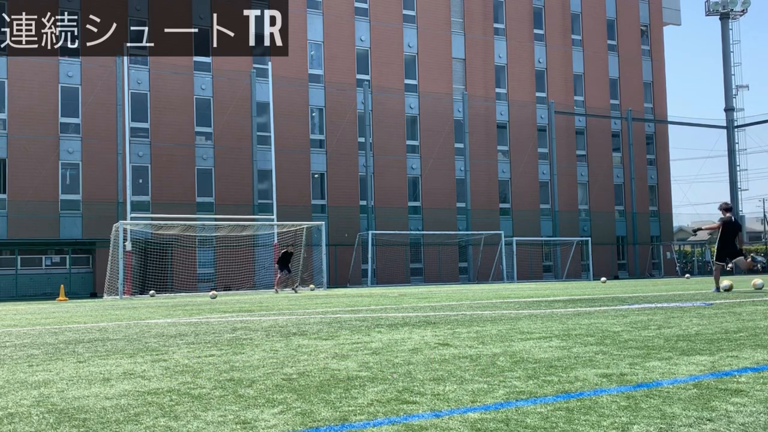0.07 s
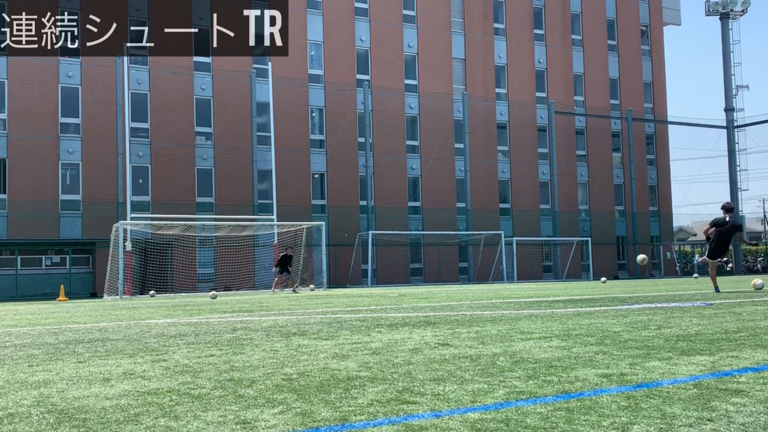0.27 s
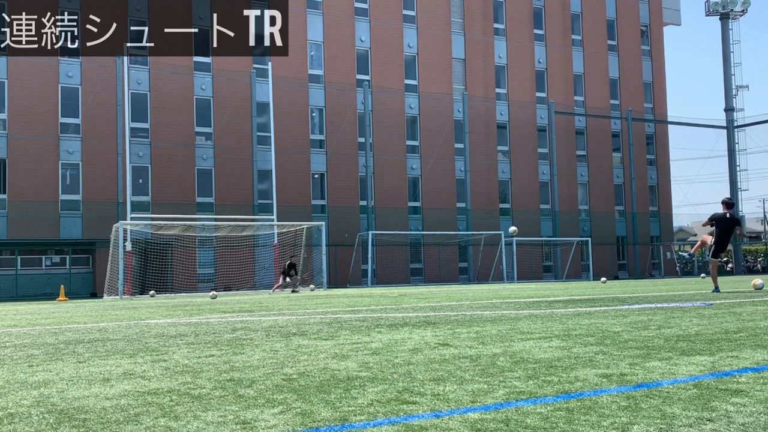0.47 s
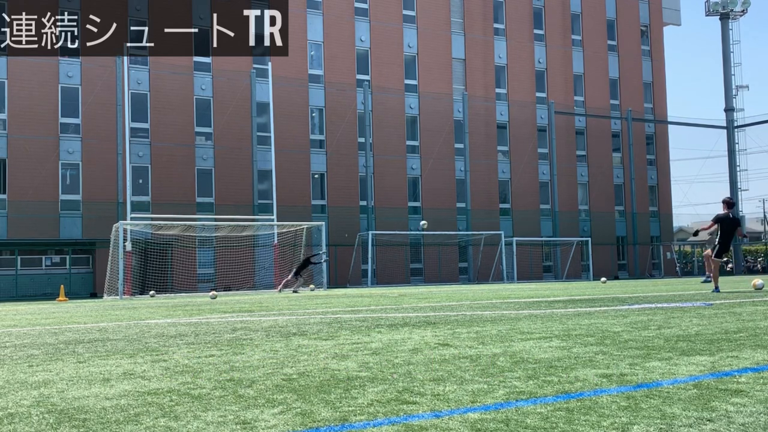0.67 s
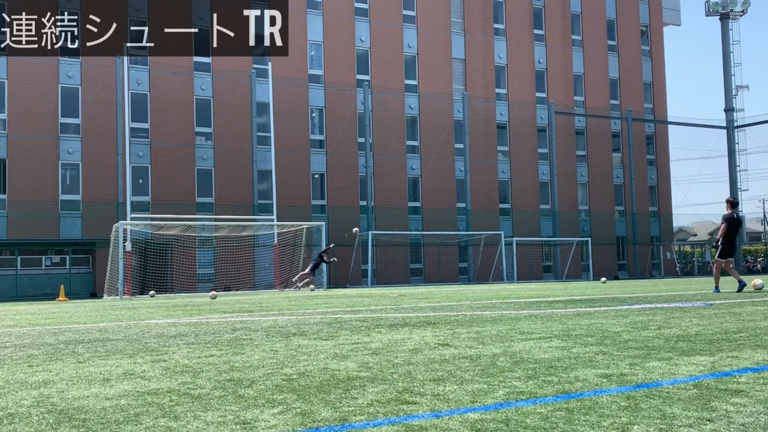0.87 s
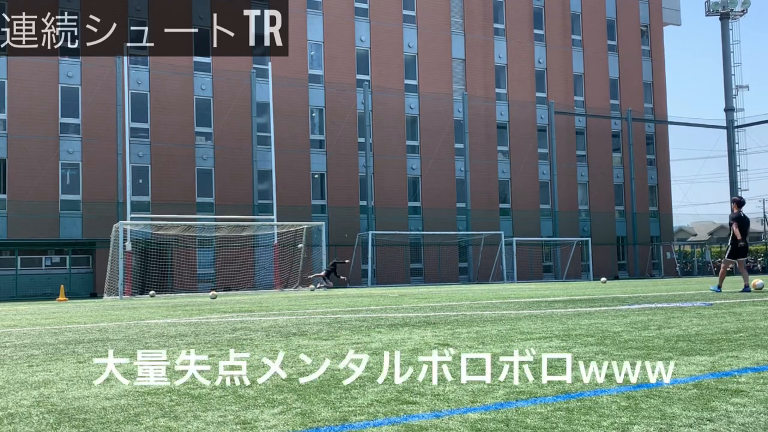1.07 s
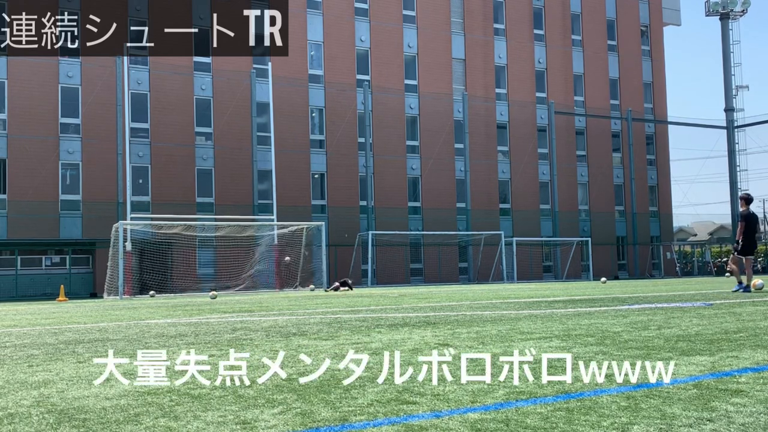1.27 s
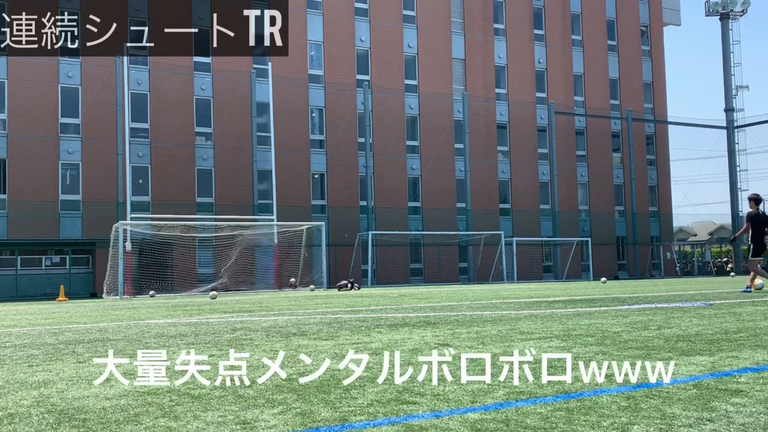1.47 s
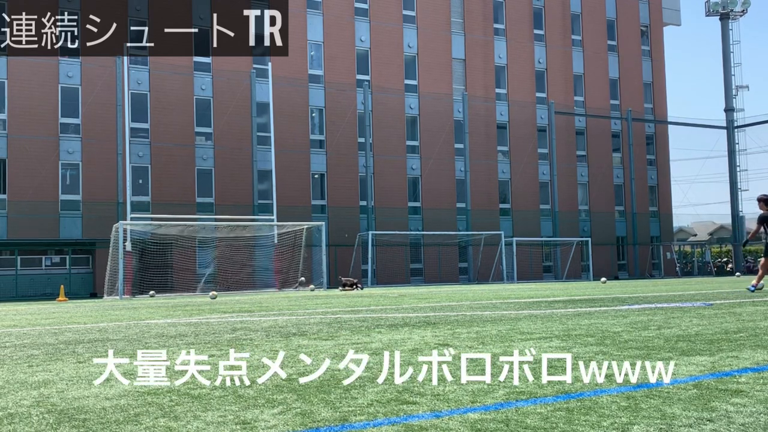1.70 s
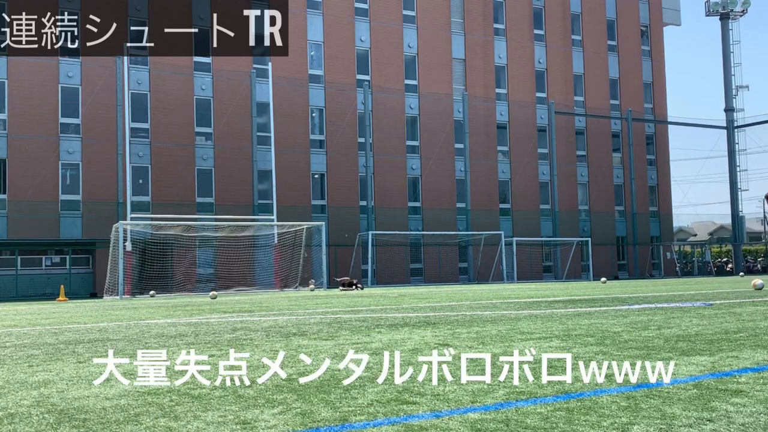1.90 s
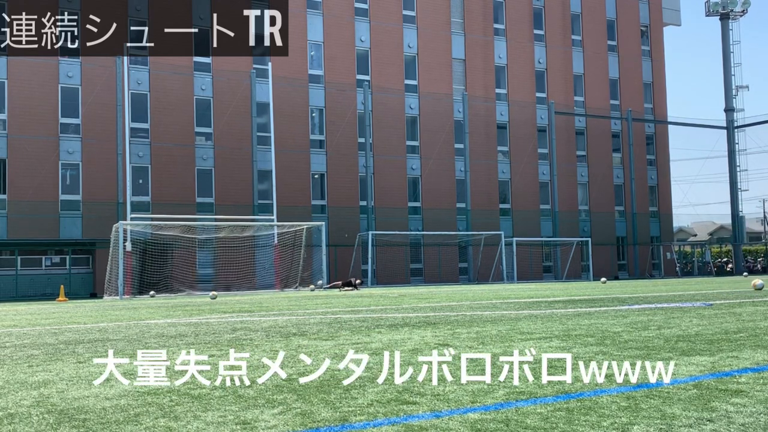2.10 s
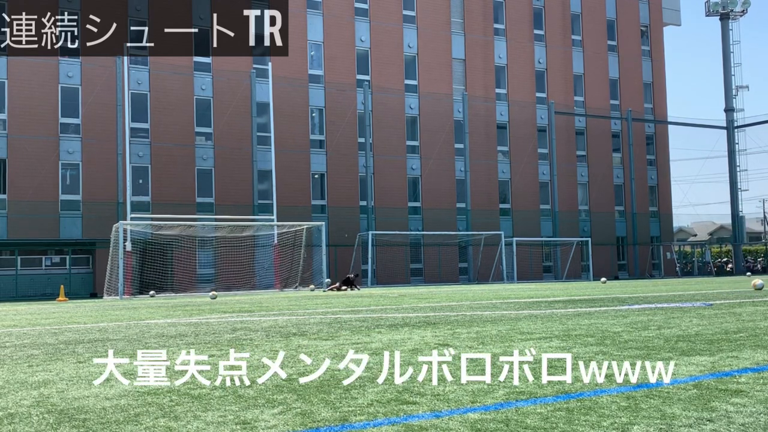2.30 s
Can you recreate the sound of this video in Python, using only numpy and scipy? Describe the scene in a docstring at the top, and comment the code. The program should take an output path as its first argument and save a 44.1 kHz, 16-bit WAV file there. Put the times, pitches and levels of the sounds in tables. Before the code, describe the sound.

A football is kicked with a loud thump that echoes off a building. A goalkeeper slides faintly on artificial turf, then the ball hits the net, which swishes and jingles. Low wind and town rumble continue underneath.

```python
"""On an artificial pitch, over low wind and town rumble, a football is kicked hard.
The impact excites the ball's shell and enclosed air, and a tall building reflects the thump.
The kicker's boot lands and the keeper slides, both heard through friction on plastic grass.
The ball slaps into the net: the mesh swishes, the frame and its metal fittings ring in their
natural modes, and the ball drops to the ground."""
import sys
import numpy as np
from scipy import signal
from scipy.fft import rfft, irfft
from scipy.io import wavfile

SR = 44100
rng = np.random.default_rng(int(sys.argv[2]) if len(sys.argv) > 2 else 0)


def wav_out(sig):
    """Save sig, one row per channel (or a flat mono array), as 16-bit PCM at SR to the path in sys.argv[1]."""
    wavfile.write(sys.argv[1], SR, np.round(np.clip(np.atleast_2d(sig).T, -1, 1) * 32767).astype(np.int16))


N = 108045


def undb(db):
    return 10 ** (np.asarray(db) / 20)

def unit(x):
    return x / np.sqrt(np.mean(x ** 2))

def since(start_s):
    return np.maximum(np.arange(N) / SR - start_s, 0)

def stereo(mid, side):
    return np.array([mid + side, mid - side])

def pan(db):
    """Direction by level difference, left minus right."""
    return undb(np.array([[db], [-db]]) / 2)

def colour(x, spectrum):
    """Spectral shaping through (frequency_hz, level_db) points."""
    hz, db = np.array(spectrum, float).T
    bins_hz = np.maximum(np.arange(N // 2 + 1) * SR / N, 1)
    return irfft(rfft(x) * undb(np.interp(np.log(bins_hz), np.log(hz), db)), N)

def dull(x, cutoff_hz):
    """Second-order low-pass filtering."""
    return signal.sosfilt(signal.butter(2, cutoff_hz, fs=SR, output="sos"), x)

def noise(spectrum, width):
    """Coloured noise, widened by an uncorrelated side signal."""
    mid, side = unit(colour(rng.standard_normal((2, N)), spectrum))
    return stereo(mid, width * side)

def swell(start_s, attack_s, decay_s):
    """Linear rise, exponential decay."""
    t = since(start_s)
    return np.minimum(t / attack_s, 1) * np.exp(-np.maximum(t - attack_s, 0) / decay_s)

def flutter(cutoff_hz=70, depth_db=1.3):
    """Random amplitude modulation: a quick, uneven gain."""
    wobble = unit(dull(rng.standard_normal(N), cutoff_hz))
    return undb(depth_db * np.clip(wobble, -2, 2))

def near(x, decay_s=0.011, reflections_db=2, right_lag_s=0.0001):
    """Early reflections from ground and posts join the direct sound, differently in each channel."""
    t = np.arange(1024) / SR
    reflections = rng.standard_normal((2, len(t))) * np.exp(-t / decay_s)
    reflections /= np.sqrt(np.sum(reflections ** 2, axis=1, keepdims=True))
    direct = np.sinc((t - np.array([[0], [right_lag_s]])) * SR)
    return signal.fftconvolve(direct + undb(reflections_db) * reflections, x[None], axes=1)[:, :N]

def rub(spectrum, start_s, attack_s, decay_s, level_db, slips_per_s=4000, spread_db=3):
    """Stick-slip friction: tiny random slips of fibres merge into a hiss."""
    slips = (rng.random(N) < slips_per_s / SR) * rng.standard_normal(N)
    slips *= undb(spread_db * np.minimum(rng.exponential(size=N), 4))
    return undb(level_db) * near(unit(colour(slips, spectrum)) * swell(start_s, attack_s, decay_s))

def ring(modes, knocks, attack_s=0.003):
    """Modal superposition: each knock excites damped sines, weighted and detuned anew."""
    out = np.zeros((2, N))
    hz, mode_db, t60_s = np.array(modes).T[:, :, None]
    for start_s, level_db in knocks:
        t = since(start_s)
        spread_db, detune, skew = rng.standard_normal((3, len(modes), 1))
        envelope = np.minimum(t / attack_s, 1) * np.exp(-np.log(1000) * t / t60_s)
        amplitude = undb(level_db + mode_db + spread_db) * envelope
        phase = 2 * np.pi * hz * (1 + 0.0009 * detune) * t
        out += [np.sum(amplitude * np.sin(phase + side * 0.7 * skew), axis=0) for side in (1, -1)]
    return out


# Spectrum of wind and town, and its side level relative to mid: frequency_hz, level_db
AIR_SPECTRUM = [(15, -58), (25, -15), (59, -2), (134, -2.5), (249, -15), (350, -18), (476, -26.5),
                (591, -33.5), (1790, -40.5), (4370, -57.5), (8590, -74), (11300, -65.5), (16000, -87)]
AIR_WIDTH = [(30, -16), (70, -11), (150, -14), (300, -7.5), (600, 1), (1500, 0.5), (10000, 0.5)]

def wind_and_town(level_db=-35.5, waver_db=1.22):
    """Broadband noise: the bass is slowly amplitude-modulated, the treble steady and wide."""
    mid, side = unit(colour(rng.standard_normal((2, N)), AIR_SPECTRUM))
    waver = unit(colour(rng.standard_normal(N), [(8, 0), (30, -40.5), (100, -83)]))
    steady = undb(level_db) * stereo(mid, colour(side, AIR_WIDTH))
    bass = colour(steady, [(200, 0), (700, -20.5)])
    return steady + (undb(waver_db * waver) - 1) * bass


def thump(start_s, pitch_hz=1192, halving_s=0.001522, level_db=1.35):
    """A damped chirp: the ball's boom lasts a few cycles and falls quickly in pitch."""
    attack_s, hold_s, decay_s = 0.0071, 0.013, 0.0053
    t = since(start_s)
    phase = 2 * np.pi * pitch_hz * halving_s * np.log1p(t / halving_s)
    envelope = np.minimum(t / attack_s, 1) * np.exp(-np.maximum(t - hold_s, 0) / decay_s)
    return undb(level_db) * envelope * np.sin(phase)


# Modes of the ball's shell and enclosed air: pitch_hz, level_db, t60_s
BALL_MODES = [(408, -51.5, 0.018), (614, -36, 0.08), (801, -28.5, 0.059), (1233, -42.5, 0.044),
              (1760, -31.5, 0.035)]

def shell(start_s):
    """Free vibration gives the ball a brief hollow ring."""
    t = since(start_s)
    return sum(undb(db) * np.sin(2 * np.pi * hz * t) * np.exp(-np.log(1000) * t / t60_s)
               for hz, db, t60_s in BALL_MODES)


# Spectrum of boot on leather: frequency_hz, level_db
SLAP_SPECTRUM = [(500, -0.5), (1800, 5.5), (3300, -8.5), (5500, -3), (7500, -5), (11000, -11.5),
                 (16000, -18)]

def kick(start_s=0.2232, left_lag_s=0.000245, slap_db=-35):
    """Impact excitation: slap, boom and ring come from the right, earlier and louder on that side."""
    boom = np.array([thump(onset_s) + shell(onset_s) for onset_s in (start_s + left_lag_s, start_s)])
    low_mids = signal.lfilter(*signal.iirpeak(273, Q=2.13, fs=SR), boom)
    boom -= undb(-2.5) * low_mids
    contact = swell(start_s, 0.0019, 0.0012) + undb(-24) * swell(start_s, 0.0066, 0.015)
    slap = undb(slap_db) * noise(SLAP_SPECTRUM, width=1) * contact
    return (boom + slap) * pan(-1.7)


def scatter(sound, start_s, decay_s):
    """Diffuse reflection: many small returns smear a sound in time."""
    mid, side = rng.standard_normal((2, N)) * swell(start_s, 0.0063, decay_s)
    response = stereo(mid, 0.25 * side) / np.sqrt(np.sum(mid ** 2))
    return signal.fftconvolve(response, sound[None], axes=1)[:, :N]

def whistle(start_s, end_hz=1245, drop_hz=130, glide_s=0.025, level_db=-47):
    """An exponential glide: a faint tone sinks as it fades."""
    hz = end_hz + drop_hz * np.exp(-since(start_s) / glide_s)
    tone = np.sin(2 * np.pi * np.cumsum(hz) / SR)
    return undb(level_db) * swell(start_s, 0.0023, 0.032) * tone * flutter()


# Returns of the kick: start_s, specular_db, diffuse_db, diffuse_decay_s, pan_db
REFLECTIONS = [(0.3632, -22.5, -24.5, 0.034, 2.5), (0.4161, -20.5, -29, 0.02, 8),
               (0.538, -34.5, -48, 0.021, 4)]

def echoes(ring_db=13, tail_db=-15.5):
    """Reflection from building fronts: dull repeats, a low rolling tail and a faint whistle."""
    first_s = REFLECTIONS[0][0]
    muffled_kick = dull(thump(0) + undb(ring_db) * shell(0), cutoff_hz=1150)
    out = undb(tail_db) * scatter(dull(thump(0), cutoff_hz=198), first_s, decay_s=0.3)
    for start_s, specular_db, diffuse_db, decay_s, pan_db in REFLECTIONS:
        specular = undb(specular_db) * dull(thump(start_s), cutoff_hz=320)
        diffuse = undb(diffuse_db) * scatter(muffled_kick, start_s, decay_s)
        out += pan(pan_db) * (specular + diffuse)
    return out + whistle(first_s)


# Spectra of rubbed turf, its body and its bright blades: frequency_hz, level_db
TURF_SPECTRUM = [(700, -32), (1700, -7), (2400, -1), (3200, -1.5), (3900, -14), (5000, -10), (8000, -27.5),
                 (14000, -32)]
BLADE_SPECTRUM = [(2000, -27), (4500, -8), (6000, -5), (7200, 4.5), (8400, -20), (9800, -6.5), (11800, -15),
                  (14000, -28)]

def step():
    """Brief friction: the kicker's boot brushes the turf as it lands."""
    landing = dict(start_s=0.418, attack_s=0.011, decay_s=0.033)
    return rub(TURF_SPECTRUM, **landing, level_db=-63) + rub(BLADE_SPECTRUM, **landing, level_db=-77)

def keeper():
    """Sliding friction: clothes and gloves skid over plastic grass and scrape to a stop."""
    slide = rub(TURF_SPECTRUM, start_s=0.81, attack_s=0.07, decay_s=0.088, level_db=-55.5)
    scrape = rub(TURF_SPECTRUM, start_s=0.92, attack_s=0.067, decay_s=0.038, level_db=-60.5)
    skid = rub(BLADE_SPECTRUM, start_s=0.854, attack_s=0.024, decay_s=0.028, level_db=-49.5)
    return (slide + scrape + skid) * pan(-1.4)


# Dull blows of the ball: start_s, thud_db, smack_db, decay_s
BALL_BLOWS = [(1.192, -36, -37, 0.0079), (1.259, -43, -43.5, 0.018), (1.343, -30.5, -48, 0.02),
              (1.61, -32, -48, 0.0084), (1.622, -32, -48.5, 0.024)]
# Spectra of a blow's low and bright parts: frequency_hz, level_db
THUD_SPECTRUM = [(50, -3), (150, 13.5), (350, -2), (600, -7), (1200, -67), (4000, -82)]
SMACK_SPECTRUM = [(300, -1.5), (900, 2.5), (1300, -7.5), (2400, 5), (3100, -6.5), (4200, -12), (8000, -34),
                  (14000, -42)]

def blows(attack_s=0.0014):
    """Heavily damped impacts: the ball strikes the net, is caught by it and drops."""
    thud, smack = noise(THUD_SPECTRUM, width=0.12), noise(SMACK_SPECTRUM, width=0.59)
    return sum((undb(thud_db) * thud + undb(smack_db) * smack) * swell(start_s, attack_s, decay_s)
               for start_s, thud_db, smack_db, decay_s in BALL_BLOWS)


# Spectra of taut cords, swishing mesh and settling net: frequency_hz, level_db
CORD_SPECTRUM = [(300, 3), (800, -5), (1200, -8), (2000, -3), (3100, 1.5), (4600, -5.5), (5700, -16),
                 (7200, -10), (8400, -34), (10000, -11), (14000, -46)]
MESH_SPECTRUM = [(1000, 0), (3000, -4.5), (4600, 5), (5700, -7.5), (7000, 3), (7800, -9), (8500, -36),
                 (9300, 3), (10600, 1), (12600, -6.5), (13600, -23), (14900, -18), (15800, -36)]
SETTLE_SPECTRUM = [(1000, -24), (3000, 2), (4000, 8), (5000, 9), (5750, -14), (7200, -13), (8400, -45),
                   (10000, -17), (14000, -44)]

def net():
    """Friction under tension: the ball drags the mesh taut, then the net swings back and settles."""
    hit = rub(CORD_SPECTRUM, start_s=1.193, attack_s=0.014, decay_s=0.19, level_db=-45)
    snap = rub(CORD_SPECTRUM, start_s=1.2565, attack_s=0.001, decay_s=0.016, level_db=-41)
    drag = rub(MESH_SPECTRUM, start_s=1.226, attack_s=0.032, decay_s=0.032, level_db=-40)
    recoil = rub(MESH_SPECTRUM, start_s=1.307, attack_s=0.019, decay_s=0.056, level_db=-47.5)
    settle = rub(SETTLE_SPECTRUM, start_s=1.45, attack_s=0.56, decay_s=0.23, level_db=-62)
    return (hit + snap) * pan(-0.61) + drag + recoil + settle


# Modes of the ball against taut cords: pitch_hz, level_db, t60_s
CLACK_MODES = [(797, -8, .022), (1195, -11, .025), (1776, -12, .03), (2080, -2, .022), (2557, -2, .013),
               (2972, -4, .018)]
# Contacts with the cords: start_s, level_db
CORD_CONTACTS = [(1.1933, -29), (1.1992, -38)]

def clack():
    """Impulsive excitation: hard contact with the cords rings the ball briefly."""
    return ring(CLACK_MODES, CORD_CONTACTS, attack_s=0.0004)


# Modes of the goal frame: pitch_hz, level_db, t60_s
FRAME_MODES = [(826, -7, .2), (1513, -4, .4), (2439, -4, .45), (2575, -4, .45), (2657, -4, .4),
               (3010, 2, 1.0), (3191, -3, .4), (4156, -10, .4), (4243, -10, .4)]
# Tugs of the net: start_s, level_db
NET_TUGS = [(1.194, -52), (1.232, -50), (1.262, -51), (1.335, -53), (1.47, -60)]

def frame():
    """Lightly damped resonance: the hollow frame rings on after each tug."""
    return ring(FRAME_MODES, NET_TUGS)


# Modes of a metal fitting: pitch_hz, level_db
FITTING_MODES = [(4738, -3), (6575, -9), (7142, 0), (9450, -21), (10230, -22), (10596, -18), (11790, -26)]
# Knocks on the fittings: start_s, level_db, tilt_db_per_octave, t60_s
FITTING_KNOCKS = [(1.2045, -48, -15, .045), (1.2436, -42, 6, .05), (1.3314, -51, -3, .08),
                  (1.3514, -46, 3, .11), (1.399, -39, 3, .085), (1.482, -43.5, 20, .08),
                  (1.559, -67, -25, .09), (1.577, -71, -25, .08), (1.7094, -70, 5, .12)]

def fittings(main_hz=7142):
    """Loose metal chatters: each contact sets the damping and the spectral tilt below the main mode."""
    out = np.zeros((2, N))
    for start_s, level_db, tilt, t60_s in FITTING_KNOCKS:
        modes = [(hz, db + tilt * min(np.log2(hz / main_hz), 0), t60_s) for hz, db in FITTING_MODES]
        out += ring(modes, [(start_s, level_db)]) * flutter()
    return out


# Mode of a larger hook: pitch_hz, level_db, t60_s
HOOK_MODE = [(3273, 0, .07)]
# Knocks on the hook: start_s, level_db
HOOK_KNOCKS = [(1.236, -42), (1.376, -44)]

def hook():
    """A single damped resonance: the loose hook pings and chatters."""
    return ring(HOOK_MODE, HOOK_KNOCKS) * flutter()


def scene():
    """Superposition of shot, dive and goal in the open air."""
    shot_and_dive = kick() + echoes() + step() + keeper()
    goal = net() + clack() + frame() + hook() + fittings() + blows()
    return shot_and_dive + goal + wind_and_town()

def record(dry, low_cut_hz=28, top_hz=15700):
    """Band limiting and clipping: the deepest bass is thinned, peaks stop at full scale, the top is cut."""
    thinned = signal.sosfilt(signal.butter(2, low_cut_hz, "high", fs=SR, output="sos"), dry)
    clipped = np.clip(thinned, -1, 1)
    return signal.sosfilt(signal.ellip(8, 0.2, 80, top_hz, fs=SR, output="sos"), clipped)


dry = scene()
out = record(dry)
wav_out(out)
```